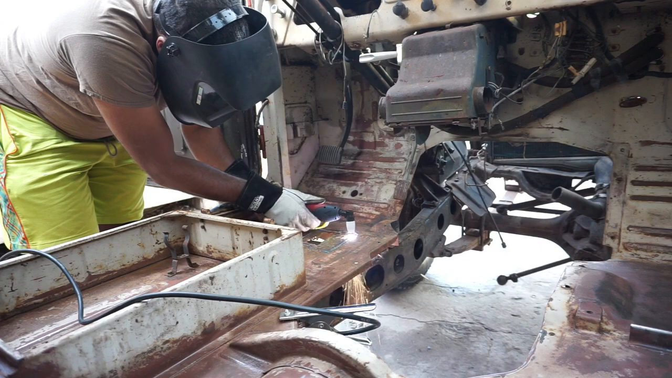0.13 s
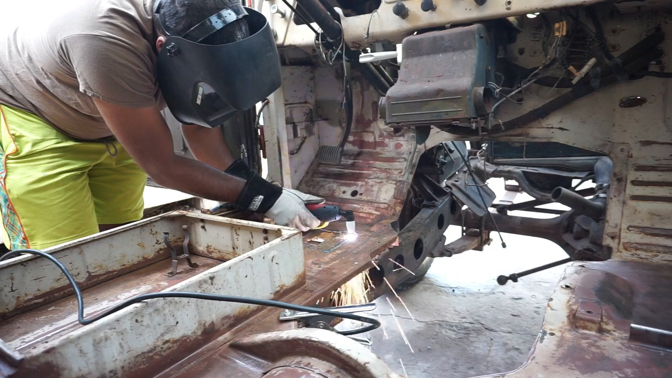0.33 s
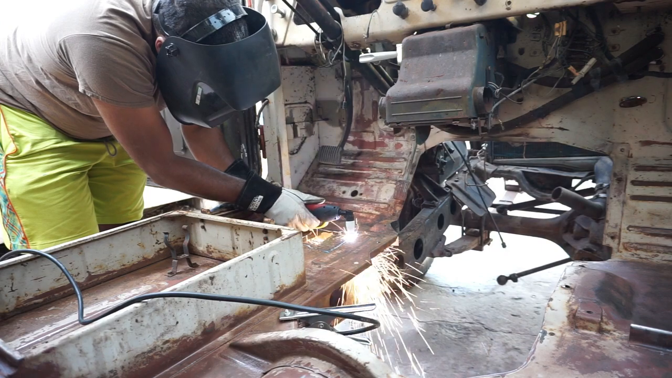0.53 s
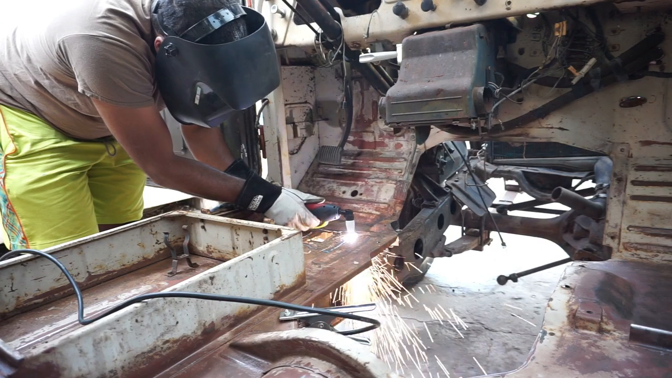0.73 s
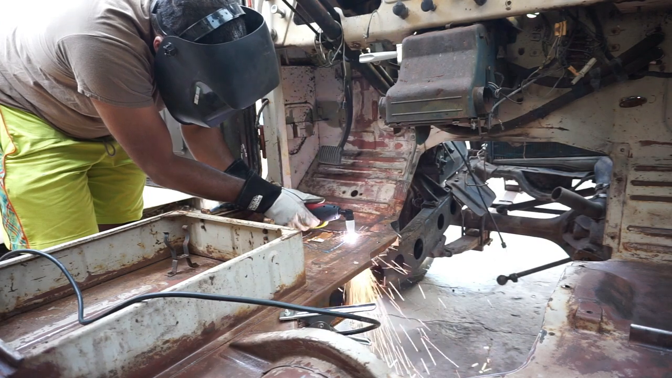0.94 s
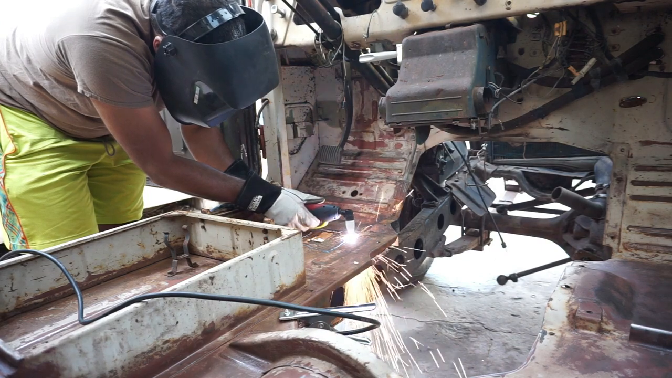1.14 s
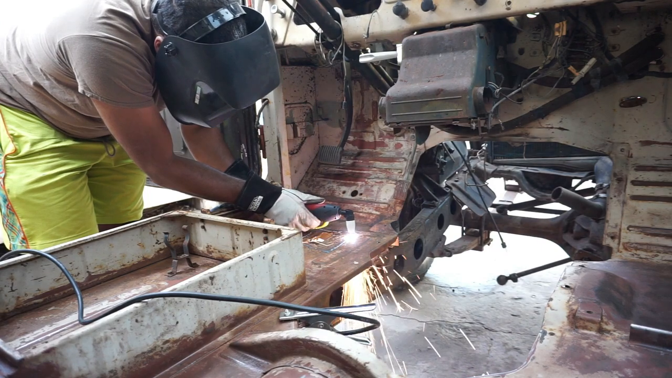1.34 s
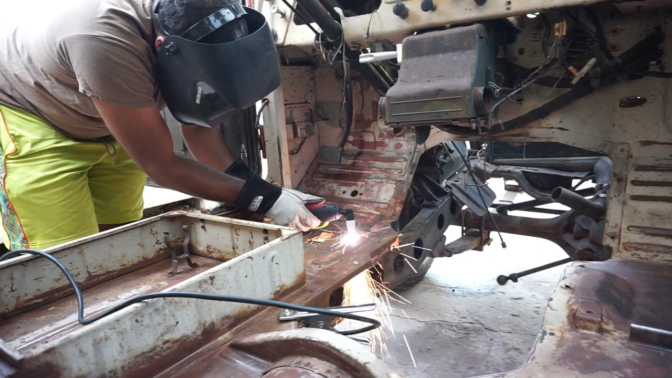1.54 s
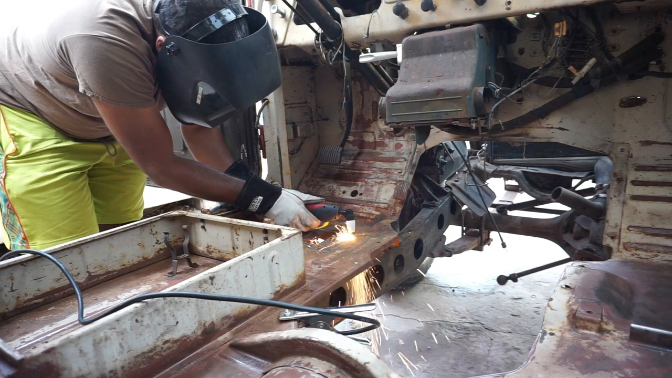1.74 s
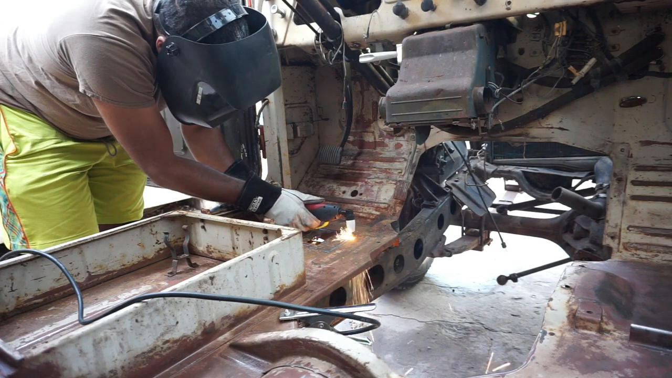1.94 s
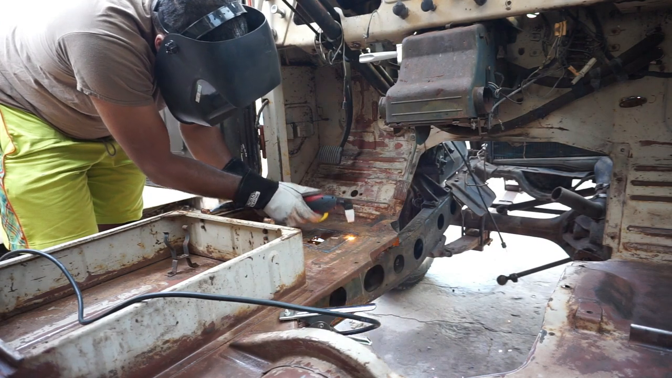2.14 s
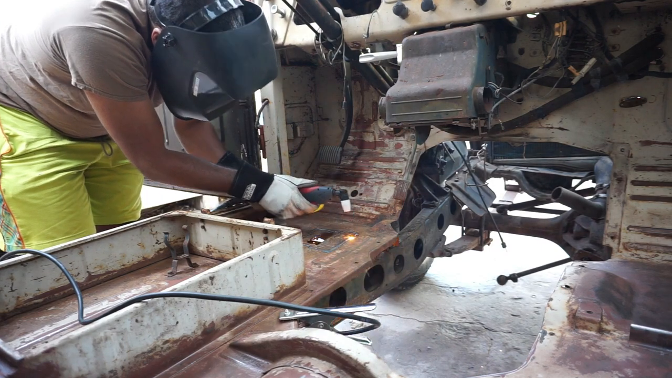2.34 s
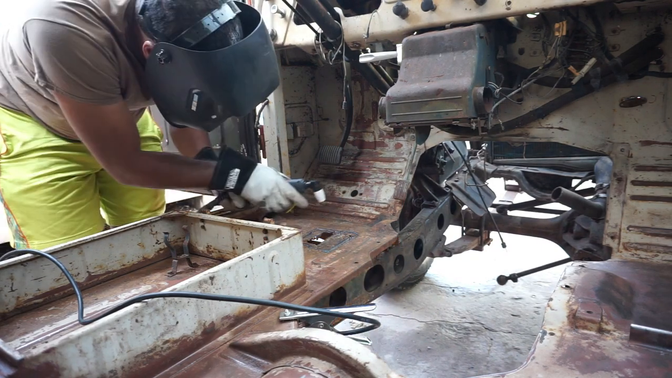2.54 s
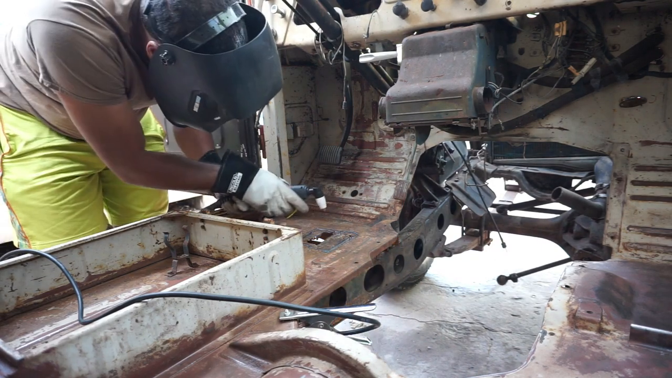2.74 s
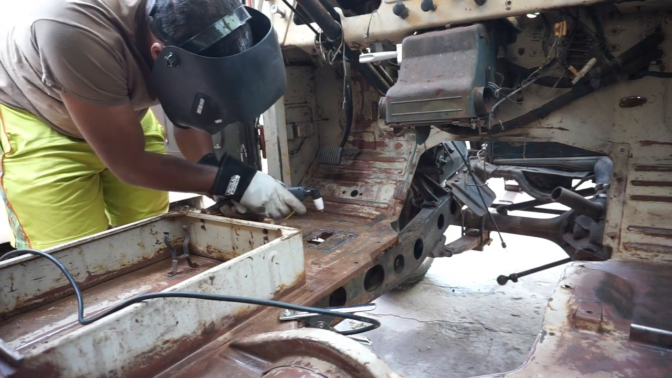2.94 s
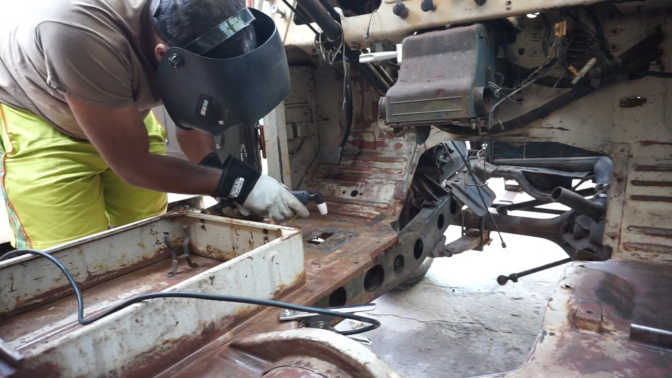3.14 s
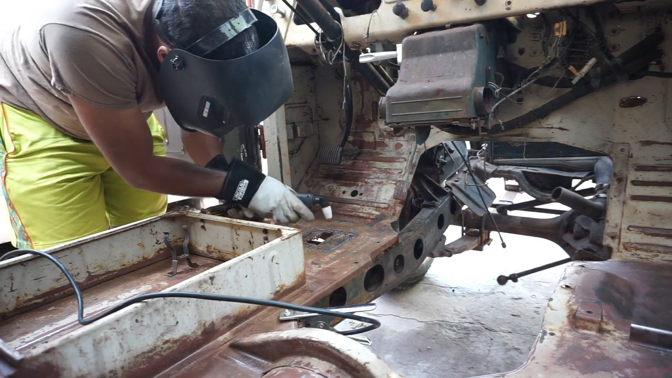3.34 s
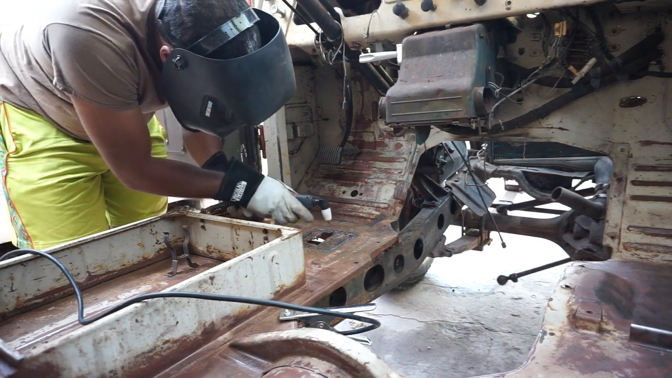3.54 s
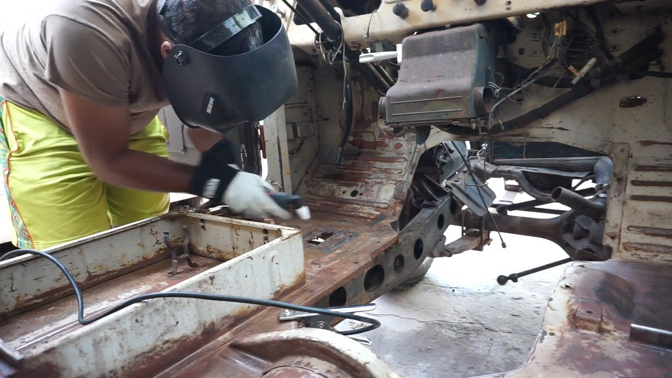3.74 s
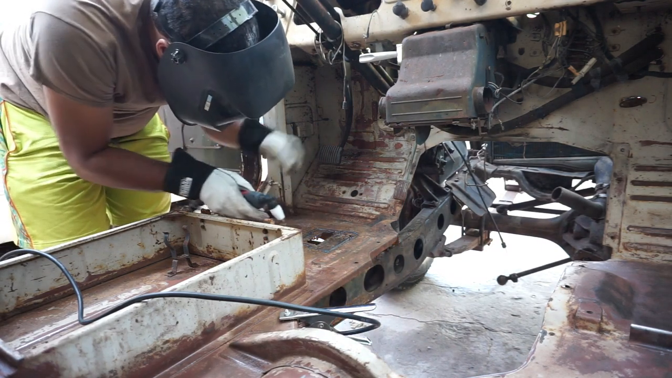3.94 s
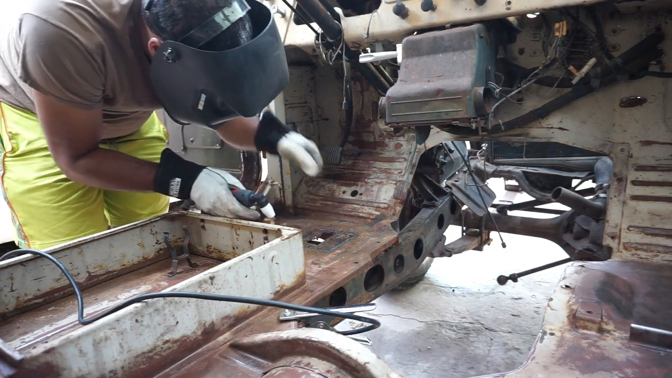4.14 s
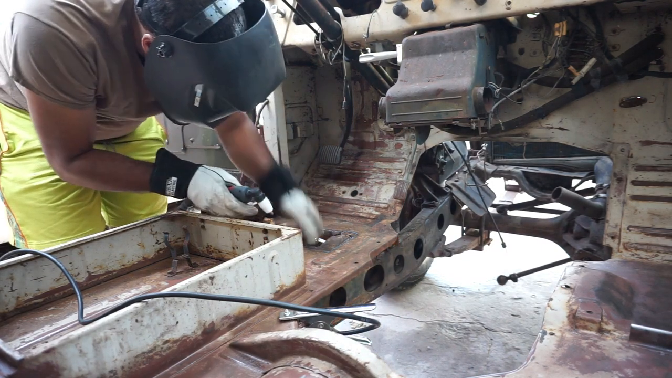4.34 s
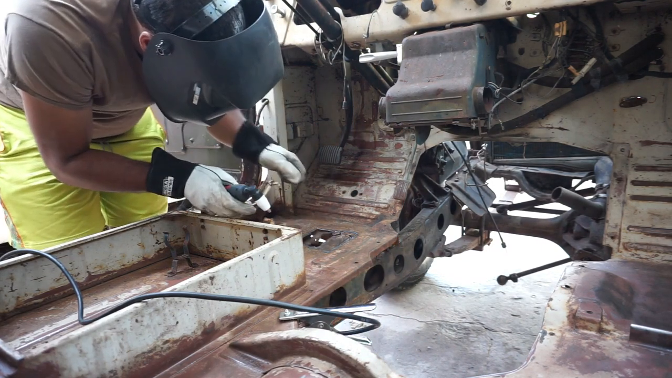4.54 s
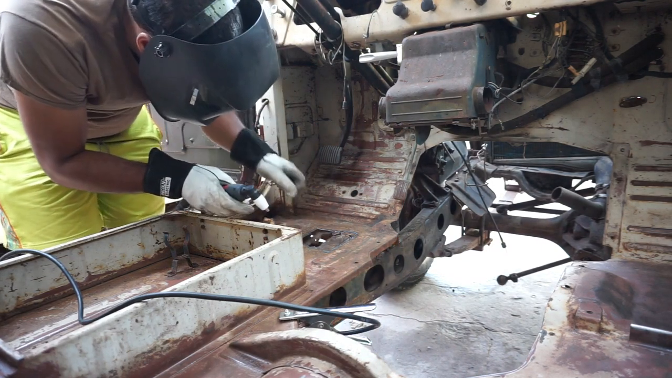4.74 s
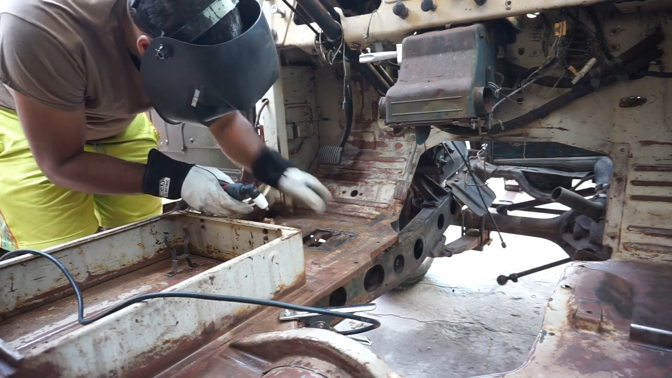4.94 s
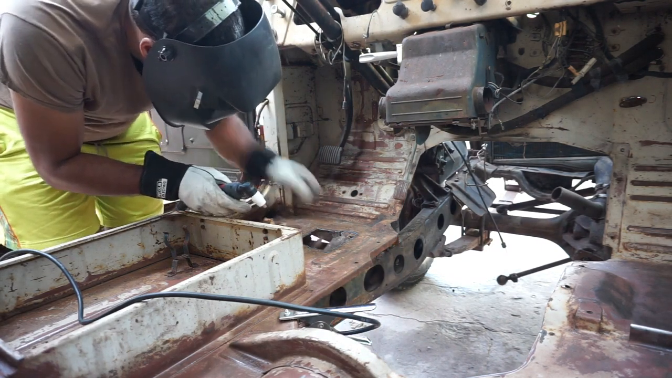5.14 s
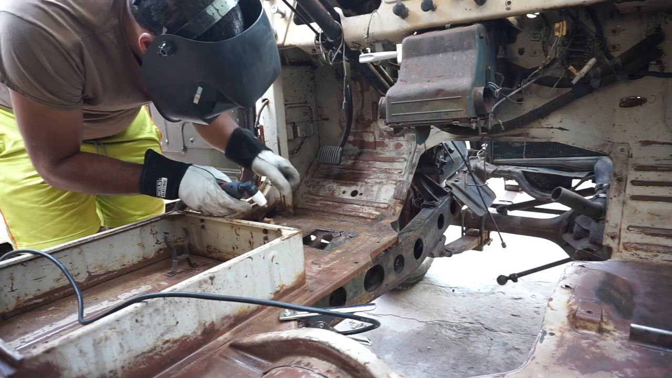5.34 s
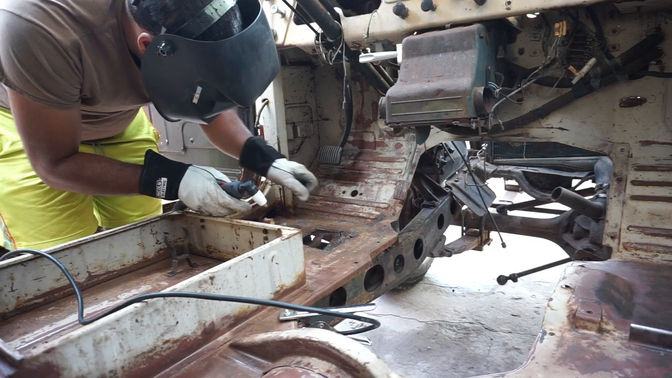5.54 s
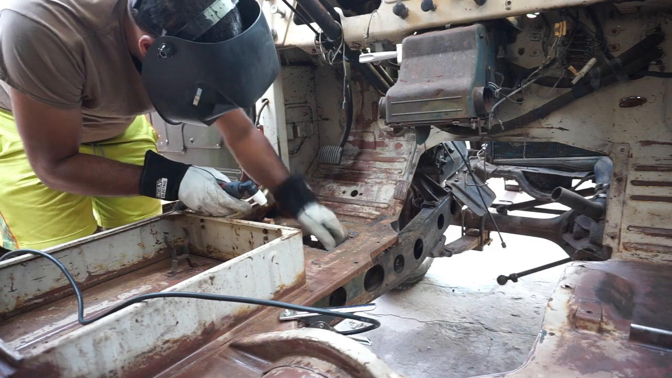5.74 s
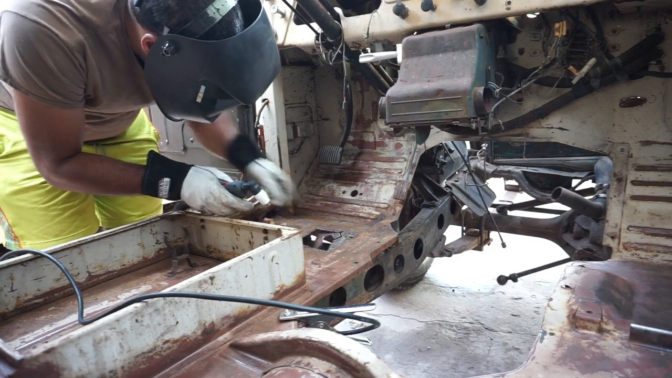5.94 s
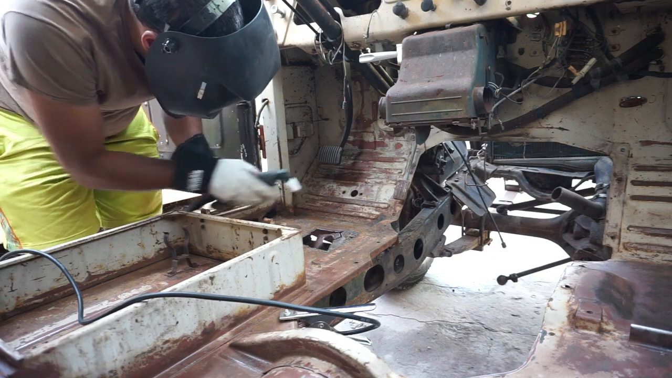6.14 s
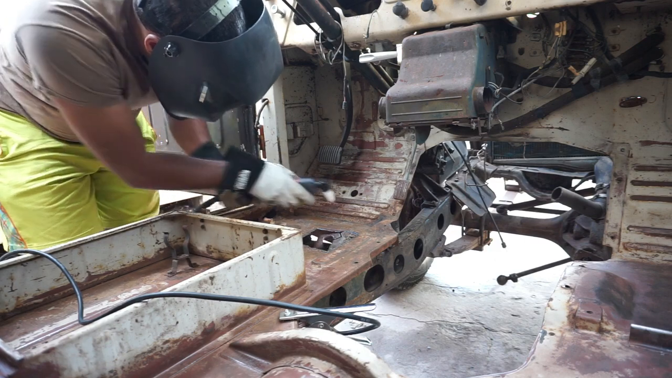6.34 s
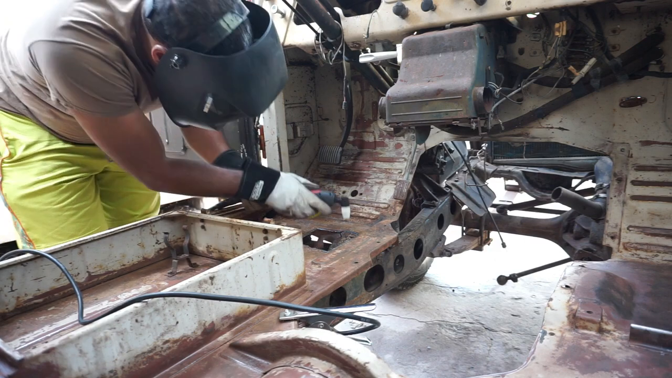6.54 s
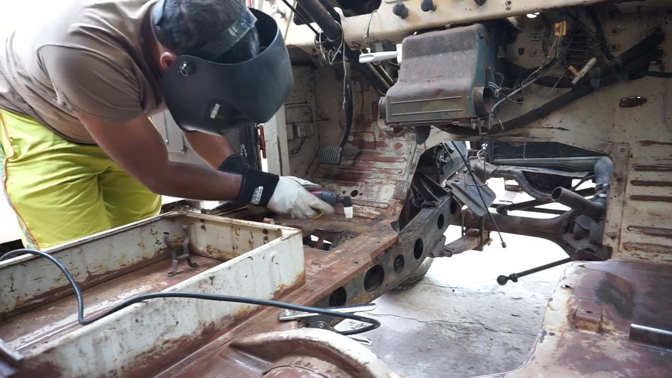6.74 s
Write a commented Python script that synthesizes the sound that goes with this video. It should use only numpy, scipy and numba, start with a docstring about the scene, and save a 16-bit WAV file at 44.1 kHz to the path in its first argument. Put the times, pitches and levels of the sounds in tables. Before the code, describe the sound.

Close up in a garage, inside a stripped metal vehicle body, a plasma torch cuts steel with a loud, bright, sputtering hiss slightly right. The arc puffs out, weaker air blows on, and a breathy tone slides down as the torch lifts. The hiss stops abruptly, leaving a buzzing compressor drone left of centre. Three gloved slaps make loose steel clang and rattle, briefly pushing the drone down.

```python
"""Garage, inside a stripped vehicle body: close to the microphones and a little right, a hand-held plasma torch,
turbulent noise shaped into hiss, rush and hollow, pierces and cuts rusty sheet steel with sputter and spits.
The arc goes out with a puff, air blows on, and a tone from the cut's edge falls as the torch is lifted.
The hiss breaks off and an air compressor, a clatter repeated each shaft turn plus hum lines, drones left of centre.
A gloved hand slaps the cut piece three times; bursts of contacts ring the steel and gain control ducks the drone."""
import sys
import numpy as np
from scipy import signal
from scipy.fft import rfft, irfft
from scipy.io import wavfile
from scipy.ndimage import uniform_filter1d
from numba import njit

SR = 44100
rng = np.random.default_rng(int(sys.argv[2]) if len(sys.argv) > 2 else 0)


def unload_audio(sound):
    """Save the sound as a 16-bit wav file, at the path given as the first command line argument."""
    columns = np.transpose(np.atleast_2d(sound))
    # keep every value between -1 and 1, then stretch to whole-number steps
    steps = np.round(np.clip(columns, -1, 1) * 32767)
    wavfile.write(sys.argv[1], SR, steps.astype(np.int16))


N = 299880
TIME = np.arange(N) / SR

# difference between the two microphones: [f/Hz, side-over-mid level/dB]
STEREO_WIDTH = [(60, -13), (190, -15), (350, -12), (630, -8), (1130, -4), (2020, -4), (3640, -1.5),
                (6540, 0)]
# reference level of the torch jet while it cuts: [t/s, level/dB]
CUT_LEVEL = [(0.0, -27), (0.142, -26.5), (0.184, -28), (1.154, -28.5), (1.174, -26.5), (1.288, -28.5),
             (1.7, -28)]
# spectrum of the nozzle hiss: [f/Hz, relative level/dB]
HISS_SPECTRUM = [(1500, -60), (3500, -9.5), (5500, -2), (7300, 1), (9200, 2), (10000, 5), (10800, 7),
                 (12000, -12)]
# spectrum of the jet rushing over the steel: [f/Hz, relative level/dB]
RUSH_SPECTRUM = [(150, -75), (330, -59), (700, -17), (1200, -13), (2200, -0.5), (3500, 2), (4600, -1),
                 (6500, -6), (11000, -33)]
# resonances of the box section under the cut: [f/Hz, nominal width/Hz, relative level/dB]
BOX_SECTION = [(174, 7.8, -11), (530, 79, -1.5), (1128, 98, 6.5), (1340, 450, 5.5)]
# spectrum of the compressor casing: [f/Hz, relative level/dB]
CASING_SPECTRUM = [(30, -32), (130, -21.5), (250, -17), (330, -6), (480, -27), (590, -47), (720, -4.5),
                   (900, -10), (1600, -9.5), (2000, -12.5), (2600, -14.5), (3000, -17.5), (4300, -16),
                   (5300, -21.5), (6300, -19), (9000, -23.5), (11000, -22)]
# resonances of the compressor's tank and belt guard: [f/Hz, width of the sharper pass/Hz, relative level/dB]
TANK_AND_GUARD = [(375, 18.4, 13), (471, 123, 10), (677, 26, 9.5)]
# compressor hum lines: [multiple of the shaft speed, level/dB]
HUM_LINES = [(2, -64), (4, -64), (6, -47), (7, -52), (16, -45.5), (22, -49.5), (44, -49.5), (47, -51.5),
             (48, -47.5), (53, -48.5), (56, -43.5), (60, -54.5), (72, -55), (88, -53.5), (93, -54)]
# slaps on the cut piece: [t/s, graze lead/s, graze level/dB, slap level/dB, treble/dB, thud/dB,
# rattle length/s, strongest ring f/Hz]
HAND_SLAPS = [(4.356, 0.01, -13.5, 0, 8, -29, 0.098, 750), (5.099, .012, -11.5, 1, 2, -5.5, 0.043, 2390),
              (5.823, .025, -20.5, 0, 1, -7, 0.0087, 2550)]
# the piece falls back on the floor: [t/s, level/dB, treble/dB, thud/dB, rattle length/s, strongest ring f/Hz,
# first bounce after/s, first loss per bounce/dB]
PIECE_DROPS = [(4.44, -4.5, 4.5, -21, 0.017, 260, .105, 4), (5.176, -1.5, 7.5, 5.5, .026, 1900, .059, 8),
               (5.838, -4.5, -18, 6, .024, 1174, .03, 6)]
# clear modes of the steel floor: [f/Hz, relative level/dB, time to fall 60 dB/s]
FLOOR_MODES = [(164.6, -3.5, 0.99), (211.3, -6.5, 0.7), (284.6, -3.5, 0.76), (301.8, -10, 0.65),
               (400, -34, 0.2), (591, 7, 0.29), (596, 0.5, 0.4), (789, -3.5, 0.48), (831, 1, 0.4),
               (857, 1.5, 0.34), (1174, 1.5, 0.26), (1520, -10, 0.35), (1570, 1.5, 0.18), (2060, -5, 0.37),
               (2387, 5.5, 0.087), (2885, -8, 0.24), (3430, -2.5, 0.23), (4770, -5, 0.15)]
# its dense higher modes: [f/Hz, relative level/dB, time to fall 60 dB/s]
FLOOR_CLASH = [(60, -33, .5), (128, -15, 0.73), (227, -1.5, 0.71), (393, -6.5, 0.77), (750, -1.5, 0.44),
               (1310, -2, 0.4), (2540, -3.5, 0.3), (3570, -8, 0.36), (5300, -13, 0.24), (8400, -12, 0.19),
               (11400, -10.5, 0.061)]

# jet voices (hiss, rush, hollow): cutting, relative to CUT_LEVEL; air alone on the sheet; air lifted clear
CUTTING_DB = (1.38, -10.5, -24.5)
AFTERFLOW_DB, LIFTED_DB = (-39, -47, -56.5), (-43, -53.5, -51)
# the rush is louder until the sheet is pierced
PIERCED_S, PIERCE_FADE_S, PIERCE_DB = 0.1, 0.089, 2.5
# rush and hollow settle as the kerf opens
KERF_OPEN_S, KERF_RUSH_DB, KERF_HOLLOW_DB = 1.15, 2.5, 5
ARC_OUT_S, ARC_FADE_S = 1.722, 0.042
LIFT_S, LIFT_TAKES_S = 2.085, 0.2
# edge tone: pitch at the working gap, growth in working gaps per second, and widest gap in working gaps
EDGE_HZ, GAP_PER_S, WIDEST_GAP = 8200, 21.6, 9.9
COMPRESSOR_FROM_S = 2.575
# the valve clacks at one point of each turn, as a fraction of the turn
SHAFT_HZ, STROKE_TURN, VALVE_HZ, VALVE_WIDTH_HZ = 29.07, 0.42, 985, 44
# fingers graze the piece before the slap
GRAZE_TREBLE_DB, GRAZE_RATTLE_S, GRAZE_HZ = 6, 0.0045, 3170
# bounces come sooner, weaker and duller until the next flight would be no longer than REST_S
BOUNCE_KEEPS, LOSS_GROWS, BOUNCE_DULL_DB, REST_S = 0.78, 1.08, 0.5, 0.055
BOUNCE_RATTLE_S, BOUNCE_THUD_DB, BOUNCE_HZ = 0.01, -7, 2260
# within one rattle the contacts soften
SOFTEN_DB_PER_S = 115
# the recorder's upper limit
TOP_HZ = 11020
# opposite signs for the left and right microphones
LEFT_RIGHT = np.array([[1], [-1]])


def amp(db):
    """Decibels to gain."""
    return 10 ** (np.asarray(db) / 20)


def unit(x):
    """Scale to rms 1."""
    return x / np.sqrt(np.mean(x ** 2))


def ramp(start, length):
    """Rise from 0 to 1 over a length of time in seconds."""
    return np.clip((TIME - start) / length, 0, 1)


def along(points, hz, column=1):
    """Read a spectrum column at any frequency, interpolating over log frequency."""
    points = np.array(points)
    return np.interp(np.log(hz + 1e-9), np.log(points[:, 0]), points[:, column])


def colour(x, points):
    """Give a sound a spectrum of (f/Hz, level/dB) points."""
    size = x.shape[-1]
    gain = amp(along(points, np.fft.rfftfreq(size, 1 / SR)))
    return irfft(rfft(x) * gain, size)


def ring(x, hz, width):
    """One resonance, gain 1 at its centre."""
    return signal.lfilter(*signal.iirpeak(hz, hz / width, fs=SR), x)


def spread(mid, side):
    """Left and right microphones: most alike in the bass, unrelated in the treble."""
    return mid + LEFT_RIGHT * colour(side, STEREO_WIDTH)


def noise(size=N):
    """Stereo noise with the width of the space."""
    return spread(*rng.standard_normal((2, size)))


def walk(rate):
    """Smooth random wander, about `rate` new values per second, with a spread near 1."""
    k = int(SR / rate)
    steps = np.repeat(rng.standard_normal(N // k + 1), k)
    return 1.3 * uniform_filter1d(uniform_filter1d(steps, k), k)[:N]


def jet_levels():
    """Hiss, rush and hollow in dB as the torch pierces, cuts, blows air alone and is lifted."""
    cut_db = np.interp(TIME, *np.transpose(CUT_LEVEL))
    narrow = 1 - ramp(0, KERF_OPEN_S)
    piercing = 1 - ramp(PIERCED_S, PIERCE_FADE_S)
    starting = (0, KERF_RUSH_DB * narrow + PIERCE_DB * piercing, KERF_HOLLOW_DB * narrow)
    out, lifted = ramp(ARC_OUT_S, ARC_FADE_S), ramp(LIFT_S, LIFT_TAKES_S)
    levels = []
    for cutting, extra, air, clear in zip(CUTTING_DB, starting, AFTERFLOW_DB, LIFTED_DB):
        with_arc = cut_db + cutting + extra
        air_alone = air + lifted * (clear - air)
        levels.append((1 - out) * with_arc + out * air_alone)
    return levels


def nozzle_hiss(arc, spit_db=-17):
    """Turbulent air at the nozzle, with molten grains spat out as sparse impulses while the arc burns."""
    struck = rng.random(N) < 500 / SR  # about 500 grains per second
    strength = rng.standard_normal(N) * amp(1.1 * rng.exponential(size=N))
    spits = unit(struck * strength)
    return unit(colour(noise() + amp(spit_db) * arc * spits, HISS_SPECTRUM))


def box_hollow():
    """Air blown into the box section below excites its broad resonances."""
    draught = noise()
    hollow = 0
    for hz, width, db in BOX_SECTION:
        # two gentle passes make steeper skirts
        hollow = hollow + amp(db) * ring(ring(draught, hz, 2 * width), hz, 2 * width)
    return unit(hollow)


def arc_puff():
    """The dying arc lets out a short, dull burst of air."""
    spectrum = [(60, -34), (170, -18), (300, -24), (600, 1), (1000, 7), (1600, 1), (4000, -35)]
    swell = np.exp(-((TIME - ARC_OUT_S - 0.015) / 0.028) ** 2)
    return unit(colour(noise(), spectrum)) * swell


@njit
def sweep(x, hz, damping):
    """A resonance whose centre moves, gain 1 at the centre."""
    y, band, low = np.empty(len(x)), 0., 0.  # band and low are the filter's two memories
    for i in range(len(x)):
        g = np.tan(np.pi * hz[i] / SR)
        v = (band + g * (x[i] - low)) / (1 + g * (g + damping))
        band, low, y[i] = 2 * v - band, low + 2 * g * v, damping * v
    return y


def edge_tone(edge_db=-33, fall_db=2.3, swell_s=0.048, damping=1.26, lowest_hz=1080):
    """Air catches the cut's edge as the torch lifts: pitch is inverse to the gap, level falls per doubling."""
    gap = np.minimum(1 + GAP_PER_S * np.maximum(TIME - LIFT_S, 0), WIDEST_GAP)
    air = np.array([sweep(channel, EDGE_HZ / gap, 1. * damping) for channel in noise()])
    # the small opening radiates little bass
    air = signal.sosfilt(signal.butter(4, lowest_hz, "high", fs=SR, output="sos"), air)
    # the tone swells in just ahead of the lift
    swell = np.exp(-(np.minimum(TIME - LIFT_S, 0) / swell_s) ** 2)
    return air * amp(edge_db - fall_db * np.log2(gap)) * swell


def panels(x, share=0.87, decay_s=0.012):
    """Panels around the torch send quick echoes that ripple the spectrum, differently at each microphone."""
    t = TIME[:SR // 30]
    echoes = noise(len(t)) * np.exp(-t / decay_s)
    echoes *= share / np.sqrt(np.sum(echoes ** 2) / 2)
    echoes[:, 0] += 1  # the direct sound
    return signal.fftconvolve(x, echoes, axes=1)[:, :N] / np.sqrt(1 + share ** 2)


def torch(flutter_db=1.0, sputter_db=0.3, hollow_sputter_db=3.4, puff_db=-43, direct=0.48):
    """A turbulent air jet sputters through the kerf and blows into the hollow below."""
    hiss_db, rush_db, hollow_db = jet_levels()
    arc = TIME < ARC_OUT_S
    flutter = flutter_db * walk(46.6)
    sputter = sputter_db * arc * (walk(70) + walk(400)) / np.sqrt(2)
    slow_sputter = hollow_sputter_db * arc * walk(12.62)
    hiss = nozzle_hiss(arc) * amp(hiss_db + flutter)
    rush = unit(colour(noise(), RUSH_SPECTRUM)) * amp(rush_db + flutter + sputter)
    hollow = box_hollow() * amp(hollow_db + sputter + slow_sputter)
    jet = hiss + rush + hollow + amp(puff_db) * arc_puff() + edge_tone()
    # the torch is close, so much of it reaches both microphones alike
    jet = jet + direct * jet.mean(axis=0)
    # a little to the right
    lean_db = -0.8 * LEFT_RIGHT
    return amp(lean_db) * panels(jet)


def shaft_clatter(turns):
    """One turn's clatter, repeated each turn, excites the multiples of the shaft speed more evenly than noise."""
    size = int(SR / SHAFT_HZ)
    lines = rfft(rng.standard_normal((2, size)))
    evened = irfft(lines / np.abs(lines) ** 0.5, size)
    one_turn = colour(spread(*evened), CASING_SPECTRUM)
    fine = signal.resample(one_turn, size * 8, axis=1)  # fine enough to read between samples
    return unit(np.array([np.interp(turns, np.arange(len(c)) / len(c), c, period=1) for c in fine]))


def valve_clacks(turns, rush_share=0.5):
    """One clack per turn rings the valve, and air rushing through keeps it ringing between strokes."""
    strokes = np.diff(np.floor(turns - STROKE_TURN), prepend=-1) * amp(0.37 * walk(30))
    clack = unit(ring(ring(strokes, VALVE_HZ, VALVE_WIDTH_HZ), VALVE_HZ, 3 * VALVE_WIDTH_HZ))
    # the clack reaches the right microphone four samples later
    clacks = np.array([clack, np.roll(clack, 4)])
    return clacks + rush_share * unit(ring(noise(), VALVE_HZ, 2 * VALVE_WIDTH_HZ))


def shaft_hum(turns):
    """Sine lines locked to multiples of the shaft speed, each wandering in level."""
    hum = 0
    for (order, db), (start, skew) in zip(HUM_LINES, rng.standard_normal((len(HUM_LINES), 2))):
        # higher lines can reach the two microphones further out of step
        lag = LEFT_RIGHT * skew * min(order / 100, 0.6)
        level = np.sqrt(2) * amp(db + 0.93 * walk(8.3))
        hum = hum + level * np.sin(2 * np.pi * (order * turns + start) + lag)
    return hum


def compressor(clatter_db=-36.0, air_db=-35.0, tank_db=-40, valve_db=-40):
    """Each shaft turn repeats a clatter and a valve clack, over hum, casing air and a resonant tank."""
    turns = SHAFT_HZ * TIME + 0.003 * walk(5)  # the turning wanders slightly
    clatter = amp(clatter_db) * shaft_clatter(turns)
    air = amp(air_db) * unit(colour(noise(), CASING_SPECTRUM))
    tank = sum(amp(db) * ring(ring(noise(), hz, w), hz, 5 * w) for hz, w, db in TANK_AND_GUARD)
    valve = amp(valve_db) * valve_clacks(turns)
    return clatter + air + amp(tank_db) * unit(tank) + valve + shaft_hum(turns)


def blows():
    """Grazes, slaps, drops and bounces as (t/s, level/dB, treble/dB, thud/dB, rattle/s, ring f/Hz)."""
    for s, lead, graze_db, db, treble_db, thud_db, length, hz in HAND_SLAPS:
        yield s - lead, graze_db, GRAZE_TREBLE_DB, thud_db, GRAZE_RATTLE_S, GRAZE_HZ
        yield s, db, treble_db, thud_db, length, hz
    for s, db, treble_db, thud_db, length, hz, flight, loss_db in PIECE_DROPS:
        yield s, db, treble_db, thud_db, length, hz
        while flight > REST_S:
            s, db, treble_db = s + flight, db - loss_db, treble_db - BOUNCE_DULL_DB
            yield s, db, treble_db, BOUNCE_THUD_DB, BOUNCE_RATTLE_S, BOUNCE_HZ
            loss_db *= LOSS_GROWS
            flight *= BOUNCE_KEEPS


def steel_floor(modes_db=-5, bloom_s=0.0026):
    """The floor's answer to one tap: a few clear modes over a dense clash, the lows coming last."""
    t = TIME[:SR]

    def life(hz, t60):
        """Low bending waves travel slowly, so they swell later before dying away."""
        swell = 1 - np.exp(-t * hz / 2000 / bloom_s)  # bloom_s holds at 2000 Hz
        return amp(-60 * t / t60) * swell

    modes = 0
    for (hz, db, t60), (start, skew) in zip(FLOOR_MODES, rng.standard_normal((len(FLOOR_MODES), 2))):
        lag = LEFT_RIGHT * skew * min(hz / 2500, 1)
        modes = modes + amp(db) * life(hz, t60) * np.sin(2 * np.pi * (hz * t + start) + lag)
    spectrum = rfft(colour(noise(len(t)), FLOOR_CLASH))
    bins = np.fft.rfftfreq(len(t), 1 / SR)
    clash = 0
    for hz in 2. ** np.arange(5, 14, 0.5):  # half-octave bands
        band = irfft(spectrum * (bins >= hz) * (bins < hz * np.sqrt(2)), len(t))
        clash = clash + band * life(hz, along(FLOOR_CLASH, hz, 2))
    return (unit(clash) + amp(modes_db) * unit(modes)) / np.sqrt(len(t))


def slaps(level_db=21, contacts_per_s=1800, first_tap=1.33, ring_gain=2.16, ring_share=0.042, bright_hz=4000):
    """Each blow sets the loose piece chattering against the floor in a burst of small contacts."""
    force = np.zeros(N)
    t = TIME[:SR // 4]
    push = 1. * (t == 0)
    floor = steel_floor()
    treble_filter = signal.butter(1, bright_hz, "high", fs=SR)
    for s, db, treble_db, thud_db, length, hz in blows():
        struck = rng.random(len(t)) < contacts_per_s / SR
        contacts = struck * rng.standard_normal(len(t)) * np.exp(-(t / length) ** 2)
        contacts[0] = first_tap
        contacts /= np.sqrt(np.sum(contacts ** 2))
        # bare edges meeting give more treble than the padded glove
        treble_gain = amp(treble_db - SOFTEN_DB_PER_S * t)
        contacts += (treble_gain - 1) * signal.lfilter(*treble_filter, contacts)
        # around the lowest mode, one push of weight replaces the chatter
        contacts += ring(amp(thud_db) * push - contacts, 162, 51)
        # where the blow lands decides which ring stands out
        contacts += ring_gain * ring(contacts, hz, ring_share * hz)
        start = int(s * SR)
        force[start:start + len(t)] += amp(db) * contacts
    return amp(level_db) * signal.fftconvolve(force[None], floor, axes=1)[:, :N]


def scene():
    """The torch gives way abruptly to the compressor; the slaps fall on top."""
    switch = ramp(COMPRESSOR_FROM_S, 0.0047)
    left, right = switch * compressor() + slaps()
    # compressor and hand are left of centre: the right microphone hears them two samples later
    delayed_right = np.r_[0, 0, right[:-2]]
    return (1 - switch) * torch() + np.array([left, delayed_right])


@njit
def follow(level, attack, release):
    """A level detector that rises fast and falls slowly."""
    out, held = np.empty(len(level)), 0.
    for i in range(len(level)):
        held += (level[i] - held) * (attack if level[i] > held else release)
        out[i] = held
    return out


def record(dry, limit_db=-16.0, attack_s=0.0061, release_s=1.6, ceiling=1.0):
    """Gain control holds blows down and recovers slowly; tall peaks are rounded and the top is cut steeply."""
    power = uniform_filter1d(np.mean(dry ** 2, axis=0), SR // 100)
    level = np.sqrt(np.abs(power))  # abs guards against rounding below zero
    held = follow(level, 1 / (attack_s * SR), 1 / (release_s * SR))
    controlled = dry / np.maximum(held / amp(limit_db), 1)
    rounded = ceiling * np.tanh(controlled / ceiling)
    return signal.sosfilt(signal.ellip(14, 0.1, 70, TOP_HZ, fs=SR, output="sos"), rounded)


dry = scene()
out = record(dry)
unload_audio(out)
```